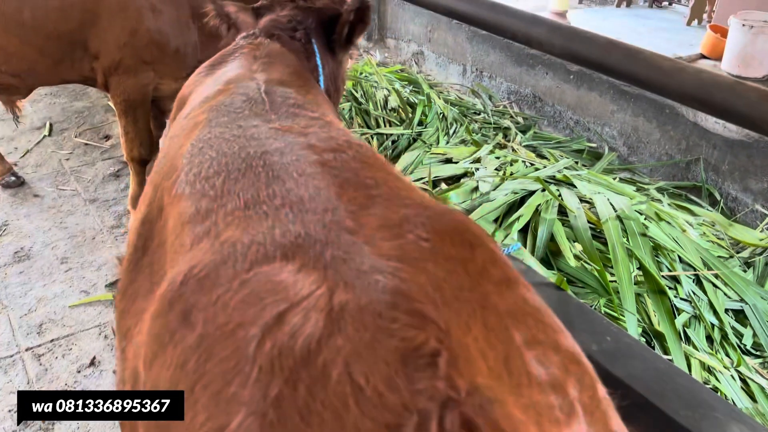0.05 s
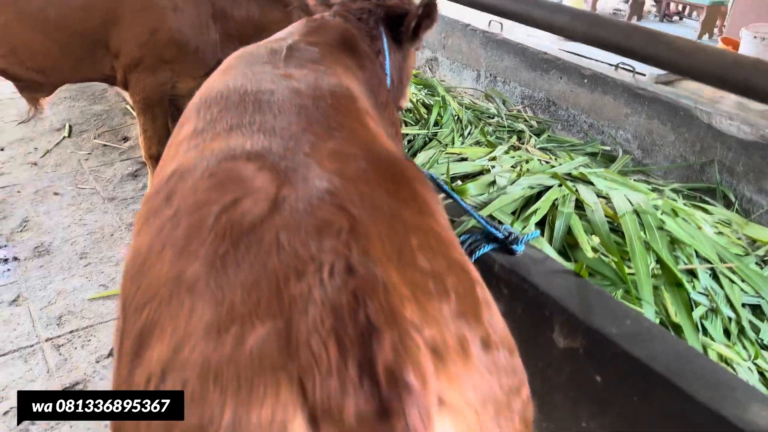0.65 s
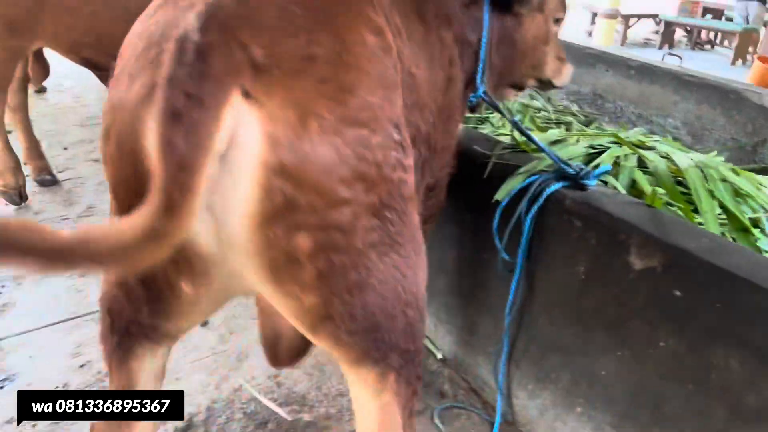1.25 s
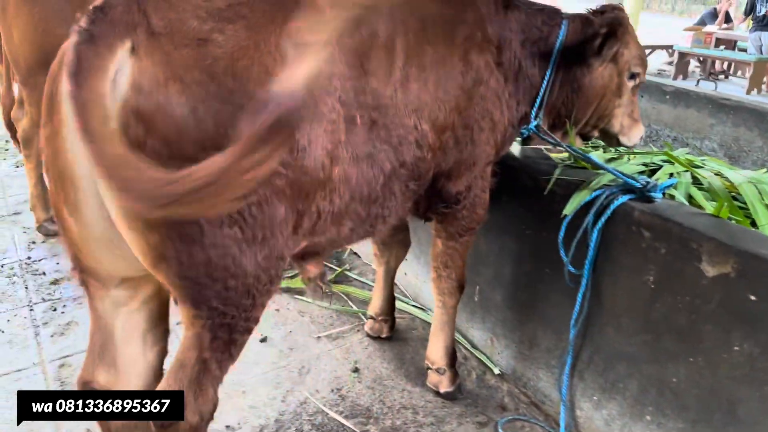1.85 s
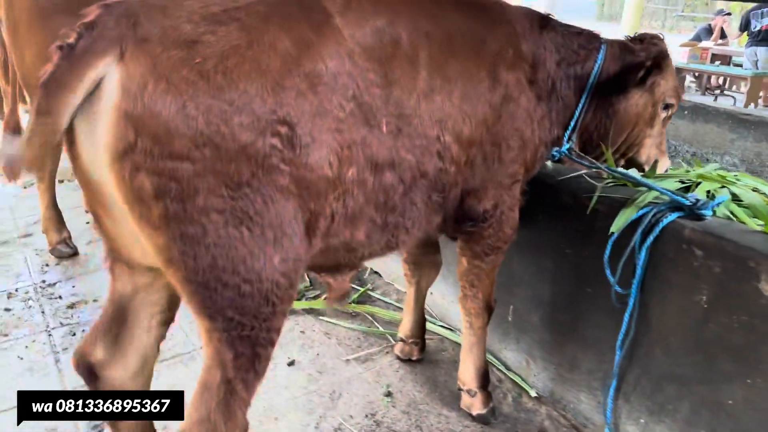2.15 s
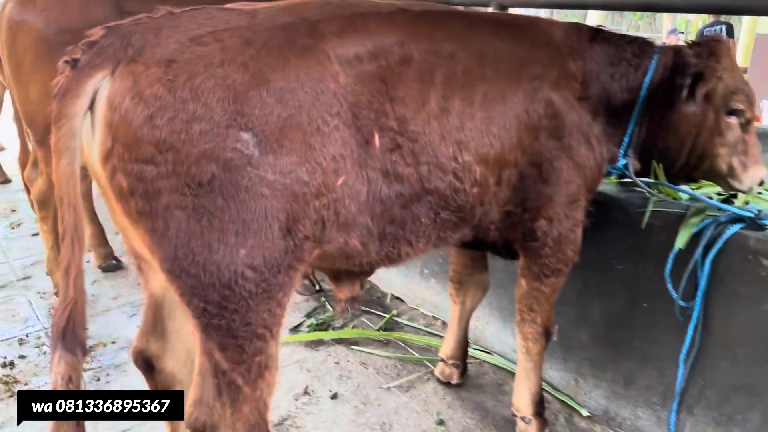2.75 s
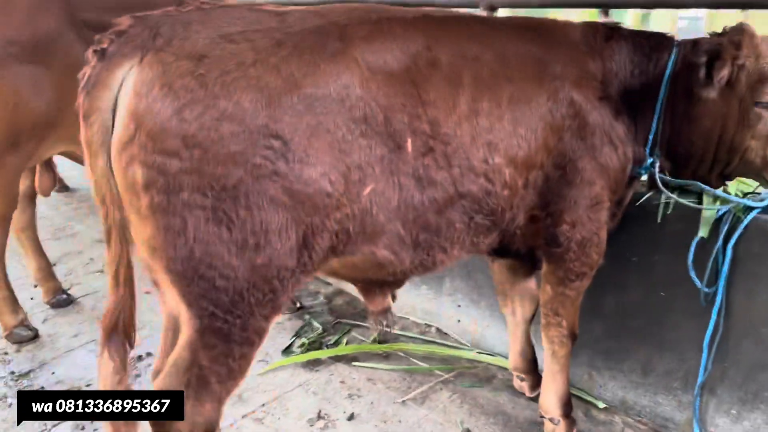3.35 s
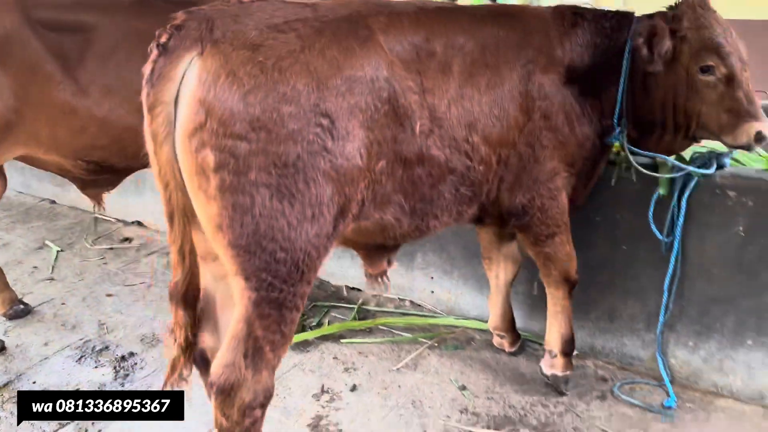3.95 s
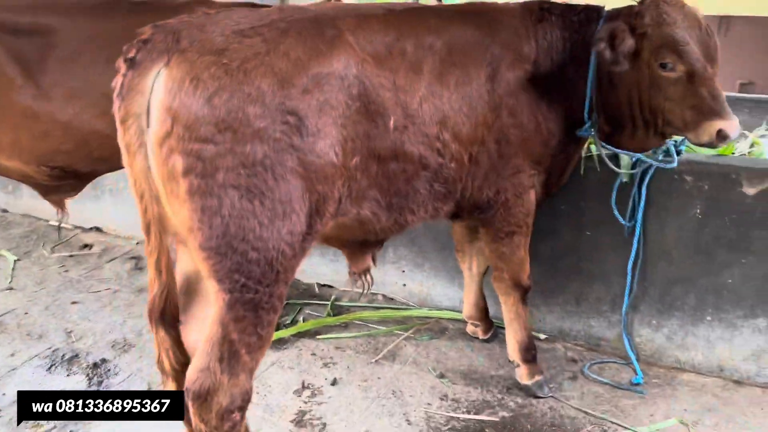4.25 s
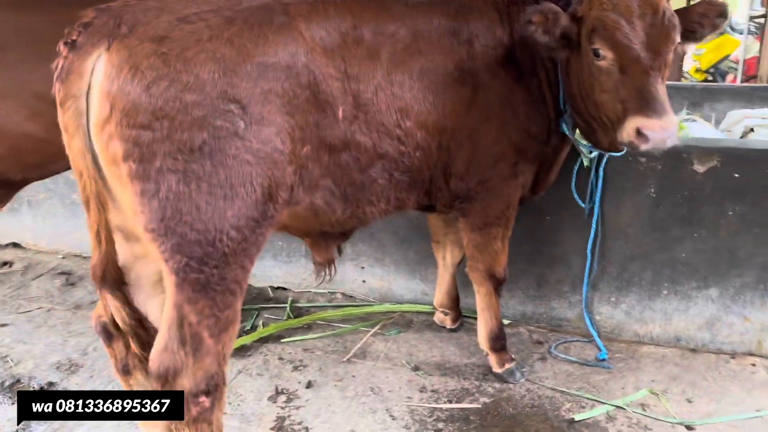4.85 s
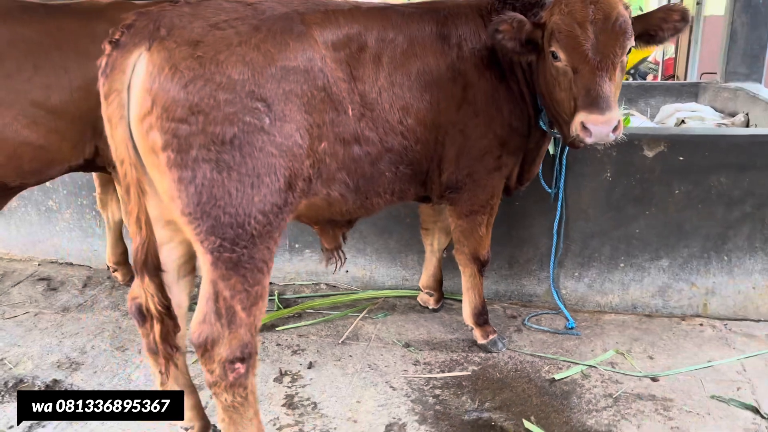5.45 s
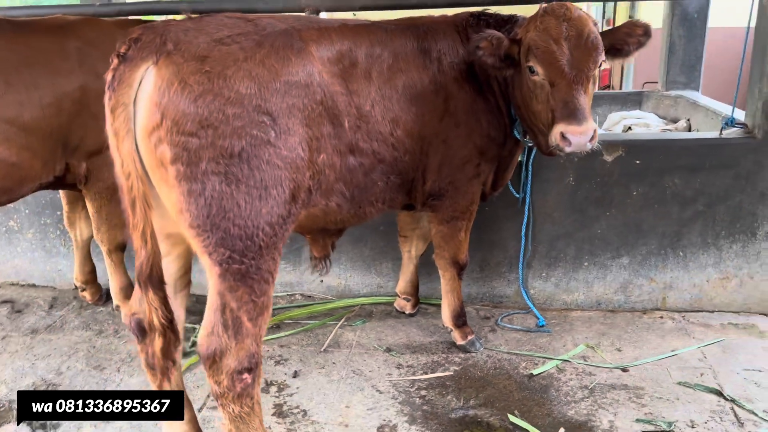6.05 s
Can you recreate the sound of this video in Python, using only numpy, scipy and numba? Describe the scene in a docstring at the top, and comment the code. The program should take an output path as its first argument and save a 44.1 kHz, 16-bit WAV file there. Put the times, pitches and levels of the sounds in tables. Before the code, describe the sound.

A calf is heard close up in a roofed pen with a light echo, over a soft, steady yard hiss. In the first 0.7 seconds there are two faint rising squeaks, brief fodder rustles and light hoof scuffs on concrete. At about 0.7 seconds the calf gives a long, low moo that starts slightly hoarse, rises a little, clears and ends roughly at 2.5 seconds. The hand-held microphone rumbles and bumps softly from the start until about 3.7 seconds. A small rustle, a scuff and a thin, faint squeak come between 3.6 and 3.9 seconds. The second moo begins at 3.9 seconds as a quiet, slow rattle, then climbs and swells into a clean, held note with a slight brassy edge, lasting until the end at about 6.2 seconds.

```python
"""A calf moos twice beside a concrete feed trough in a roofed pen. Its vocal folds snap shut again and again,
and each snap makes its throat and head ring. A moo starts as a slow, rough rattle and tightens into a clean,
long note. Fodder rustles, hooves scuff and something squeaks faintly; the calf's nose whistles thinly as the
second moo begins. Behind it all the yard hisses softly, and the hand-held microphone rumbles and bumps as it is
carried round the animal."""
import sys
import numpy as np
from scipy import signal
from scipy.fft import rfft, irfft, next_fast_len
from scipy.io import wavfile
from scipy.ndimage import uniform_filter1d, map_coordinates
from numba import njit

SR = 44100
rng = np.random.default_rng(int(sys.argv[2]) if len(sys.argv) > 2 else 0)


def unload_wav(signal):
    """Save mono or channel-first audio to the path in sys.argv[1] as 16-bit WAV at rate SR, clipped to [-1, 1]."""
    wavfile.write(
        sys.argv[1],
        SR,
        np.round(np.clip(np.atleast_2d(signal).T, -1, 1) * 32767).astype(np.int16),
    )


N = 273684
TIME = np.arange(N) / SR

# The two moos: start_s, fade_in_s, let_go_s, rasp_db (compared with the treble)
MOOS = [(0.736, 0.065, 2.469, -13), (3.86, 0.042, 6.3, -12)]
# How fast the vocal folds snap shut, one curve per moo: time_s, pitch_hz
PITCH = [
    [(.76, 87.1), (.85, 95.7), (.92, 102), (1.054, 107.9), (1.206, 111.6), (1.536, 118.1), (1.718, 121.2),
     (1.994, 123.5), (2.138, 123.8), (2.342, 121.5), (2.4, 120.1), (2.45, 117.2), (2.52, 109.5)],
    [(3.88, 45.1), (3.96, 46), (4.0, 70), (4.05, 76), (4.13, 82.5), (4.22, 86), (4.3, 90.5), (4.335, 90.5),
     (4.355, 96.5), (4.39, 100), (4.528, 104.5), (4.836, 112.2), (5.122, 115.7), (5.718, 118.9),
     (5.942, 119.4), (6.034, 119.1), (6.2, 117.5)],
]
# Slack or fluttering folds sound rough, tight ones clean. Per moo: time_s, roughness_0_to_1, breath_db
HOARSENESS = [
    [(.78, .45, 3), (.95, .26, 3), (1.15, .14, 2), (1.6, .1, 2), (1.9, .06, -1), (2.15, .05, -8),
     (2.38, .09, -5), (2.47, .85, 2)],
    [(3.9, .3, -6), (4.1, .32, -3), (4.3, .36, 0), (4.345, .75, 2), (4.39, .24, -2), (4.55, .15, -3),
     (4.75, .1, -6), (5.0, .06, -9), (5.35, .03, -15), (6.05, .03, -15), (6.2, .12, -6)],
]
# How strongly each part of the calf rings, one curve per moo:
# time_s, throat_db, pharynx_db (back of the throat), mouth_db, lips_db, nose_db, treble_db, octave_db
RING_LEVELS = [
    [(0.79, -26.5, -34, -37, -36, -48, -54, -39), (0.83, -20.5, -32, -32.5, -30.5, -34, -43.5, -48.0),
     (0.93, -21, -41, -28.5, -28, -33.5, -38.5, -43.0), (0.99, -18.5, -45, -22.5, -25.0, -31.5, -36, -40.0),
     (1.07, -21, -26.0, -29.0, -27, -29, -33.5, -29.5), (1.17, -21, -32, -23, -24, -25.5, -33.5, -39.5),
     (1.25, -23.5, -25.5, -26, -22.5, -24, -35.5, -41),
     (1.32, -26.5, -24.5, -18, -20.5, -26.5, -32.5, -34.0),
     (1.42, -17.5, -26, -15.5, -16.5, -42, -42.5, -28),
     (1.52, -17, -28.5, -22.5, -22.5, -41.5, -40.5, -26.5),
     (1.64, -17.5, -28, -23.5, -23, -37.5, -53, -25.5), (1.72, -15, -37, -20.5, -21, -28, -44.5, -24),
     (1.8, -13.0, -27, -16, -23, -30.5, -41, -27), (1.95, -17.5, -34.5, -24.5, -24, -38, -41.5, -34.5),
     (2.12, -19.5, -45, -23.5, -23.0, -33, -38.5, -40.5), (2.29, -16, -37, -25, -30.0, -39.5, -39, -50),
     (2.41, -16.0, -36, -24.5, -26, -35.5, -37.5, -45), (2.47, -25.5, -33, -25, -30, -37.0, -37.5, -35.5)],
    [(3.9, -46.5, -42.5, -57.5, -48.5, -53, -59, -63), (4, -42.5, -37.5, -40.5, -40.5, -40.5, -48.5, -54.0),
     (4.14, -29, -31.0, -28, -29.5, -37.5, -43.5, -42),
     (4.3, -25.5, -25.5, -27.5, -28, -35.0, -39.5, -39.5),
     (4.345, -34, -31.5, -24.0, -29.5, -32, -38.5, -43), (4.39, -25, -38.5, -25.5, -23.5, -32.5, -37, -49),
     (4.5, -36.5, -35, -25.0, -33.5, -33, -37.5, -45), (4.65, -39, -23, -26, -29.0, -37, -36.5, -40),
     (4.77, -30, -42, -25.5, -31, -32.5, -36, -55), (4.87, -23, -33, -16.5, -27, -32.5, -35.5, -37.5),
     (5, -22.5, -26.5, -28, -25, -28, -35.5, -35), (5.1, -17.5, -31, -26.5, -29.0, -30, -35, -38.5),
     (5.35, -22, -28.5, -25, -25.5, -25.5, -36, -46), (5.52, -26, -33.5, -25.5, -25.5, -32.5, -35, -43.0),
     (5.63, -23.5, -36.5, -32.0, -38.5, -37.5, -36, -36), (5.72, -25.5, -38.5, -27.0, -25, -31, -34.5, -34),
     (5.95, -25.0, -43.5, -27, -24.5, -43, -37, -31), (6.08, -24.0, -42, -31, -29, -34, -38.5, -32),
     (6.18, -27.5, -33, -23, -31, -29, -39, -35)],
]
# Jaw and tongue move the ringing pitches, one curve per moo:
# time_s, pharynx_hz, mouth_hz, mouth_width_hz, lips_hz, nose_hz, bright_ring_hz
MOUTH_SHAPE = [
    [(0.8, 468, 1040, 165, 1280, 1695, 2540), (0.9, 473, 1030, 134, 1350, 1670, 2640),
     (1, 500, 970, 104, 1380, 1695, 2660), (1.1, 440, 904, 180, 1390, 1593, 2640),
     (1.22, 460, 960, 175, 1190, 1620, 2830), (1.32, 465, 896, 109.5, 1335, 1574, 2490),
     (1.44, 452, 884, 100, 1320, 1800, 2520), (1.56, 512, 815, 430, 1420, 1440, 2520),
     (1.72, 475, 846, 206, 1280, 1645, 2560), (1.88, 462, 917, 226, 1420, 1700, 2440),
     (2, 475, 967, 116, 1380, 1665, 2670), (2.28, 474, 1005, 86, 1413, 1744, 2570),
     (2.47, 462, 912, 135, 1400, 1760, 2570)],
    [(3.95, 454, 1150, 174, 1525, 1824, 2530), (4.15, 471, 1127, 157, 1475, 1790, 2560),
     (4.32, 515, 1050, 193, 1500, 1810, 2605), (4.36, 410, 1030, 183, 1445, 1790, 2580),
     (4.5, 372, 1074, 147, 1510, 1775, 2640), (4.66, 410, 1015, 192, 1500, 1840, 2700),
     (4.85, 494, 1018, 59.6, 1470, 1740, 2710), (5, 476, 963, 90, 1543, 1727, 2670),
     (5.15, 514, 1025, 139, 1430, 1687, 2725), (5.4, 461.3, 1030, 440, 1354, 1750, 2640),
     (5.57, 470, 900, 550, 1440, 1660, 2685), (5.7, 473, 950, 495, 1460, 1720, 2500),
     (6, 478, 985, 203, 1474, 1670, 2435), (6.18, 540, 945, 140, 1490, 1677, 2660)],
]
# The high rings of the head: centre_hz, width_hz, relative_db
HEAD_RINGS = [(2451, 266, -1.5), (2883, 400, 1), (3232, 510, -2), (3700, 490, -12.5)]
# Tone of the voice, with a band swallowed by the nose passage: frequency_hz, gain_db
NASAL_GAP = [(60, 27), (1780, 3.5), (1950, 2), (2150, 2.5), (2350, 9), (16000, -15.5)]
# Tone of the folds' rasp: frequency_hz, gain_db
RASP_TONE = [(3700, -3), (4300, 0), (4900, 2), (5300, -6), (6600, -7), (8000, -14), (11000, -18)]
# A brassy edge grows as the second moo is pressed out: time_s, level_db
BRASS_LEVEL = [(4.4, -62), (5.1, -57), (5.7, -55.5), (6.21, -52)]
# Tone of that edge: frequency_hz, gain_db
BRASS_TONE = [(4000, -9), (5000, -4), (5600, 0), (6700, -1), (7600, -12)]
# Where the calf's head is heard: time_s, left_ear_lead_s, left_over_right_db
DIRECTION = [(4.0, .00005, .8), (4.6, .00026, 0), (5.3, .00026, .2), (5.7, .00025, 2.4)]
# Echoes from the trough and floor: frequency_hz, gain_db
NEAR_ECHOES = [(100, -18), (380, -14), (700, 0), (1300, 3), (2400, 6), (8000, 6)]
# The longer echo under the roof: frequency_hz, gain_db
ROOF_ECHO = [(100, -22), (370, -21), (900, -17), (1500, -15), (3000, -9), (8000, -12)]
# Rustles in the fodder: start_s, relative_db, fade_s (time to fall by 60 dB)
RUSTLES = [(0.0388, -55, 0.15), (0.3661, -29.5, 0.27), (0.4784, -39, 0.17), (0.7038, -39, 0.21),
           (1.5214, -31, 0.14), (1.5494, -30, 0.09), (3.6294, -37, 0.19)]
# Tone of the fodder: frequency_hz, gain_db
FODDER_TONE = [(4000, -10.5), (6400, -7), (11300, -10), (14000, -16), (15500, -14)]
# Hooves scuffing the concrete, and at 0.703 s the calf drawing breath before its first moo: start_s,
# relative_db, fade_s (time to fall by 60 dB)
SCUFFS = [(.367, -56, 0.23), (.703, -57, 0.83), (3.625, -69, 0.09), (3.711, -59, 0.23)]
# Tone of the gritty floor: frequency_hz, gain_db
GRIT_TONE = [(300, 2.5), (550, -3.5), (700, -2.5), (1100, 0.5), (1800, -7), (3500, -25)]
# Faint squeaks, and last the calf's thin nasal whistle as its second moo begins: start_s, length_s, from_hz,
# to_hz, width_hz, level_db
SQUEAKS = [(0.005, 0.23, 1520, 2100, 300, -44.5), (0.235, 0.2, 1370, 2170, 300, -43.5),
           (3.823, 0.091, 2370, 2460, 48, -45)]
# Spells when the hand jostles the microphone: start_s, end_s, relative_db
JOSTLES = [(0, 0.43, -52.5), (0.647, 1.165, -43.5), (1.17, 2.04, -42.5), (2.02, 2.683, -41),
           (2.68, 2.907, -51.5), (3.122, 3.755, -45.5)]
# Tone of the microphone's rumble: frequency_hz, gain_db
RUMBLE_TONE = [(25, -22), (45, -2.5), (65, 2), (110, 0), (160, -7.5), (250, -13.5), (420, -23.5)]
# Bumps on its case: time_s, relative_db, pitch_hz
BUMPS = [(0.09, -34, 90), (0.238, -29, 76), (0.31, -32, 51.1), (0.715, -26, 123), (1.18, -36, 115),
         (1.407, -14.5, 61.5), (1.56, -27, 120), (1.678, -20, 112), (2.06, -20, 72.7), (2.129, -19, 101),
         (2.646, -24, 78.5), (2.729, -31.5, 75.4), (2.775, -33, 131), (2.88, -40, 108.5),
         (3.077, -33.5, 73), (3.149, -42, 150), (3.199, -27, 89), (3.259, -30, 124), (3.295, -31, 68.6),
         (3.345, -35, 73.6), (3.411, -29, 148), (3.451, -27, 161), (3.477, -20.5, 148), (3.584, -28, 109),
         (3.505, -30, 90), (3.665, -29, 129), (3.705, -32, 89)]
# Tone of the yard's soft wash of noise: frequency_hz, gain_db
WASH_TONE = [(300, 0), (550, -1), (800, -4), (1500, -6), (2500, -9), (5000, -14), (9000, -25)]
# Rise and fall of the background hiss: time_s, relative_db
HISS_LEVEL = [(0.0, -58.5), (1.71, -55.5), (1.81, -57.5), (2.77, -63.5), (4.18, -57), (5.29, -56.5),
              (5.88, -61.5), (6.21, -56.5)]
# Tone of that hiss: frequency_hz, gain_db
HISS_TONE = [(1500, -6), (3000, 0), (4500, 1), (6500, 0), (8300, -4), (10300, -2.5), (12500, -8.5),
             (14300, -9.5), (15600, -18)]
# How alike noise is in the two ears: frequency_hz, likeness_0_to_1
EAR_LIKENESS = [(50, 0.95), (250, 0.77), (700, 0.43), (2000, 0.015), (8000, 0.12), (12000, 1),
                (15000, 0.62)]


def calf(rattle_below_hz=97.7, fade_db_per_s=145):
    """Pulses from the vocal folds ring the throat and head while the chest hums underneath."""
    start, fade_in, let_go, rasp_db = current_moo()
    pitch_hz, = in_time(*PITCH)
    roughness, breath_db = in_time(*HOARSENESS)
    cycles = np.cumsum(pitch_hz) / SR
    rattle = 1 / (1 + np.exp(pitch_hz - rattle_below_hz))   # near 1 at low pitch, near 0 above
    pulses, puffs = vocal_folds(cycles, roughness)
    direct, echoes = at_ears(pulses)
    vowel = coloured(.75 * direct + echoes, NASAL_GAP)   # echoes blur the vowel's pulses
    bright = coloured(direct + echoes, NASAL_GAP)
    breathy = bright + from_db(breath_db) * reflections(puffs, NEAR_ECHOES, fade_s=.03, delay_s=.001)
    voice = throat_and_head(vowel, bright, breathy, rasp_db + 10.5 * rattle)   # a rattle rasps more
    mid, side = voice   # mid is what both ears share, side is how they differ
    mid = mid + chest_hum(cycles, TIME - start, rattle)
    swell = np.clip((TIME - start) / fade_in, 0, 1) ** 2
    fade = from_db(-fade_db_per_s * np.maximum(TIME - let_go, 0))
    _, pan_db = in_time(DIRECTION)
    return np.array([mid + side, mid - side]) * swell * fade * from_db([pan_db / 2, -pan_db / 2])


def current_moo():
    """The settings of the moo that is under way, at every sample."""
    rows = np.array(MOOS)
    latest = np.searchsorted(rows[:, 0], TIME) - 1
    return rows[np.maximum(latest, 0)].T


def vocal_folds(cycles, roughness, jitter_s=.0002, shimmer_db=3.0, air_share=.6):
    """The folds snap shut once a cycle and let out a puff of air; roughness makes the snaps uneven."""
    snap_s = np.interp(np.arange(1, int(cycles[-1])), cycles, TIME)
    chance = rng.standard_normal((len(snap_s), 2))
    hoarse = np.interp(snap_s, TIME, roughness)
    place = np.clip((snap_s + jitter_s * hoarse * chance[:, 0]) * SR, 0, N - 2)
    strength = from_db(shimmer_db * hoarse * chance[:, 1])
    sample, part = place.astype(int), place % 1   # each snap is shared between two samples
    pulses = np.bincount(sample, strength * (1 - part), N) + np.bincount(sample + 1, strength * part, N)
    puffs = unit_power(rng.standard_normal(N) * np.exp(-3 * (cycles % 1)))
    return unit_power(pulses) + air_share * roughness * puffs, puffs


def throat_and_head(vowel, bright, breathy, rasp_db):
    """Air spaces ring at their own pitches and shape the moo; rasp and a brassy edge sit on top."""
    throat_db, pharynx_db, mouth_db, lips_db, nose_db, treble_db, _ = in_time(*RING_LEVELS)
    pharynx_hz, mouth_hz, mouth_width_hz, lips_hz, nose_hz, ring_hz = in_time(*MOUTH_SHAPE)
    cheek_db = (throat_db + mouth_db) / 2 - 12.5
    shift = (ring_hz / ring_hz.mean()) ** .7   # the high rings partly follow the bright ring
    head = sum(from_db(db) * resonance(breathy, hz * shift, width) for hz, width, db in HEAD_RINGS)
    head += from_db(1.5) * resonance(breathy, ring_hz, width_hz=610)
    voice = from_db(throat_db) * evened(resonance(vowel, hz=345, width_hz=60), side_db=-11.5)
    voice += swaying(resonance(vowel, pharynx_hz, width_hz=93), pharynx_db, side_db=-7.5)
    voice += swaying(resonance(vowel, hz=717.4, width_hz=94), cheek_db, side_db=-1)
    voice += swaying(resonance(vowel, mouth_hz, mouth_width_hz), mouth_db, side_db=-1)
    voice += swaying(resonance(vowel, lips_hz, width_hz=147), lips_db, side_db=-2)
    voice += swaying(resonance(vowel, nose_hz, width_hz=96), nose_db, side_db=2)
    voice += swaying(head, treble_db, side_db=-1.5)
    voice += swaying(coloured(breathy, RASP_TONE), treble_db + rasp_db, side_db=0)
    voice += swaying(coloured(bright, BRASS_TONE), in_time(BRASS_LEVEL)[0], side_db=-.5)
    return voice


def chest_hum(cycles, age_s, rattle, peak_db=-35, peak_s=.97, slope_db_per_s=11.5):
    """The body gives off two clean tones: the moo's own pitch, swelling then sinking, and its octave."""
    hum_db = peak_db - slope_db_per_s * np.abs(age_s - peak_s) - 3 * rattle   # weaker in a rattle
    octave_db = in_time(*RING_LEVELS)[-1] - .8
    phase = 2 * np.pi * cycles
    return np.sqrt(2) * (from_db(hum_db) * np.sin(phase) + from_db(octave_db) * np.sin(2 * phase))


def at_ears(pulses, wander_hz=5, wander_radians=.8):
    """The direct sound reaches the left ear first; near echoes shift as the microphone moves."""
    lead_s, _ = in_time(DIRECTION)
    left = np.interp(TIME + lead_s / 2, TIME, pulses)
    right = np.interp(TIME - lead_s / 2, TIME, pulses)
    here, there = (reflections(pulses, NEAR_ECHOES, fade_s=.21, delay_s=.002) for _ in range(2))
    turn = wander_radians * drift(wander_hz)
    echoes = (np.cos(turn) * here + np.sin(turn) * there) / np.sqrt(2)
    return np.array([pulses, (left - right) / 2]), echoes


def reflections(sound, tone, fade_s, delay_s):
    """Hard surfaces send back a dense, dying cloud of echoes, different in each channel."""
    t = TIME[:SR]
    cloud = rng.standard_normal((2, SR)) * from_db(-60 * t / fade_s) * (t > delay_s)
    cloud = coloured(cloud / np.sqrt((cloud ** 2).sum(1, keepdims=True)), tone)
    return signal.fftconvolve(np.atleast_2d(sound), cloud[:, :SR * 3 // 4], axes=-1)[:, :N]


def scrapes(events, tone, gain_db, rise_s, grain_db=2):
    """Rubbing fodder or a sliding hoof makes short, grainy bursts of noise that die away."""
    bursts = np.zeros(N)
    for start, db, fade_s in events:
        rise = np.clip((TIME - start) / rise_s + .5, 0, 1)
        bursts += rise * from_db(db - 60 * np.clip((TIME - start) / fade_s, 0, 2))
    return bursts * from_db(gain_db + grain_db * drift(400)) * stereo_noise(tone)


def squeaks():
    """Noisy whistles swell and fade while they glide upward."""
    out, noise = np.zeros((2, N)), rng.standard_normal((2, N))
    for start, length, from_hz, to_hz, width_hz, db in SQUEAKS:
        live = (TIME > start) & (TIME < start + length)
        progress = (TIME[live] - start) / length
        whistle = resonance(noise[:, live], from_hz + (to_hz - from_hz) * progress, width_hz)
        out[:, live] += from_db(db) * np.sin(np.pi * progress) * unit_power(whistle)
    return out


def handling(rumble_gain_db=6.5, bump_gain_db=7, still_db=-54, lumpy_db=5, ramp_s=.024, low_cut_hz=36):
    """The microphone's case rumbles, more so while the hand moves, and thuds when it is bumped."""
    moving = np.zeros(N)
    for start, end, db in JOSTLES:
        moving += from_db(db) * np.clip(np.minimum(TIME - start, end - TIME) / ramp_s + .5, 0, 1)
    moving *= from_db(lumpy_db * np.tanh(drift(20)))
    out = from_db(rumble_gain_db) * np.hypot(from_db(still_db), moving) * stereo_noise(RUMBLE_TONE)
    for start, db, hz in BUMPS:
        cycles = (TIME - start) * hz
        live = (cycles > 0) & (cycles < 10)
        out[:, live] += from_db(db + bump_gain_db) * thud(cycles[live])
    return signal.sosfilt(signal.butter(3, low_cut_hz, "high", fs=SR, output="sos"), out)


def thud(cycles, decay_cycles=.76, overtone_ratio=2.4, overtone_db=-10):
    """A soft knock rings the case for a cycle or two, with a weaker, higher tone on top."""
    phase = 2 * np.pi * cycles
    ring = np.sin(phase) + from_db(overtone_db) * np.sin(overtone_ratio * phase)
    soft_start = np.sin(np.pi * np.minimum(cycles, .5)) ** 2
    return ring * np.exp(-cycles / decay_cycles) * soft_start


def yard_air(wash_db=-48.5, wash_swing=2.13, hiss_gain_db=6.5, flicker_db=1.9):
    """The open yard's soft wash of noise and a flickering hiss rise and sink together."""
    level_db, = in_time(HISS_LEVEL)
    wash = from_db(wash_db + wash_swing * (level_db - level_db.mean())) * stereo_noise(WASH_TONE)
    hiss = from_db(level_db + hiss_gain_db + flicker_db * drift(30)) * stereo_noise(HISS_TONE)
    return wash + hiss


def resonance(pair, hz, width_hz):
    """Make both channels ring around one pitch; filtering twice makes the band's sides steep."""
    every_sample = np.ones(pair.shape[-1])
    angle = 2 * np.pi * hz / SR * every_sample
    radius = np.exp(-np.pi * np.abs(width_hz) / SR) * every_sample
    return np.array([band_pass(band_pass(x, angle, radius), angle, radius) for x in pair])


@njit
def band_pass(x, angle, radius):
    """Let one moving band through: angle sets its pitch, and a radius near 1 makes it narrow."""
    y = np.zeros_like(x)
    for i in range(2, len(x)):
        push = (1 - radius[i] ** 2) / 2 * (x[i] - x[i - 2])
        y[i] = push + 2 * radius[i] * np.cos(angle[i]) * y[i - 1] - radius[i] ** 2 * y[i - 2]
    return y


def swaying(pair, level_db, side_db, sway_db=1.3, sway_hz=14):
    """Bring one part of the voice to its level, with a slight wobble of its own."""
    return from_db(level_db + sway_db * drift(sway_hz)) * evened(pair, side_db)


def evened(pair, side_db, window_s=.045):
    """Even out the loudness: hold the mid channel at power 1 and the side channel at side_db."""
    size = int(window_s * SR)
    power = uniform_filter1d(uniform_filter1d(pair ** 2, size), size)
    return pair / np.sqrt(np.abs(power) + 1e-14) * from_db([[0], [side_db]])


def stereo_noise(tone):
    """Noise with a given tone, alike in both ears in the bass and the very top, less so in between."""
    size = next_fast_len(N)
    hz = np.fft.rfftfreq(size, 1 / SR)
    alike = np.clip(np.interp(hz, *np.transpose(EAR_LIKENESS)), -1, 1)
    mid, side = rfft(rng.standard_normal((2, size))) * gain_at(tone, hz)
    ears = np.sqrt(1 + alike) * mid + np.sqrt(1 - alike) * side * [[1], [-1]]
    return unit_power(irfft(ears, size)[:, :N])


def coloured(x, tone):
    """Turn a sound's lows and highs up or down to follow a tone table."""
    size = next_fast_len(x.shape[-1], True)
    gain = gain_at(tone, np.fft.rfftfreq(size, 1 / SR))
    return irfft(rfft(x, size) * gain, size)[..., :x.shape[-1]]


def gain_at(tone, hz):
    """Read a tone table as gains; past its ends the level falls by 16 dB per octave."""
    table_hz, table_db = np.transpose(tone)
    table_octave, octave = np.log2(table_hz), np.log2(np.maximum(hz, 1))
    beyond = np.abs(octave - np.clip(octave, table_octave[0], table_octave[-1]))
    return from_db(np.interp(octave, table_octave, table_db) - 16 * beyond)


def drift(rate_hz):
    """A smooth random wobble, about 1 in size, that heads for a new value rate_hz times a second."""
    targets, coarse_s = rng.standard_normal(int(N / SR * rate_hz) + 3), TIME[::20]
    wobble = map_coordinates(targets, [coarse_s * rate_hz], order=2, mode="nearest")
    return np.interp(TIME, coarse_s, unit_power(wobble))


def in_time(*curves):
    """Join curves end to end and give each column's value at every sample."""
    time_s, *columns = np.vstack(curves).T
    return [np.interp(TIME, time_s, column) for column in columns]


def unit_power(x):
    """Scale a signal so that its average power is 1."""
    return x / np.sqrt(np.mean(x ** 2) + 1e-20)


def from_db(db):
    """Turn decibels into a number to multiply by."""
    return 10 ** (np.asarray(db) / 20)


def scene():
    """The calf and the small sounds echo under the roof, over yard air and handling noise."""
    fodder = scrapes(RUSTLES, FODDER_TONE, gain_db=-10, rise_s=.004)
    hooves = scrapes(SCUFFS, GRIT_TONE, gain_db=18.5, rise_s=.025)
    pen = calf() + fodder + hooves + squeaks()
    return pen + reflections(pen, ROOF_ECHO, fade_s=.82, delay_s=.023) + yard_air() + handling()


def record(dry, ceiling=.88, cutoff_hz=15600):
    """Round off the loudest peaks and cut away the highest treble."""
    rounded = dry / (1 + (dry / ceiling) ** 8) ** (1 / 8)
    return signal.sosfilt(signal.ellip(10, .1, 80, cutoff_hz, fs=SR, output="sos"), rounded)


dry = scene()
out = record(dry)
unload_wav(out)
```